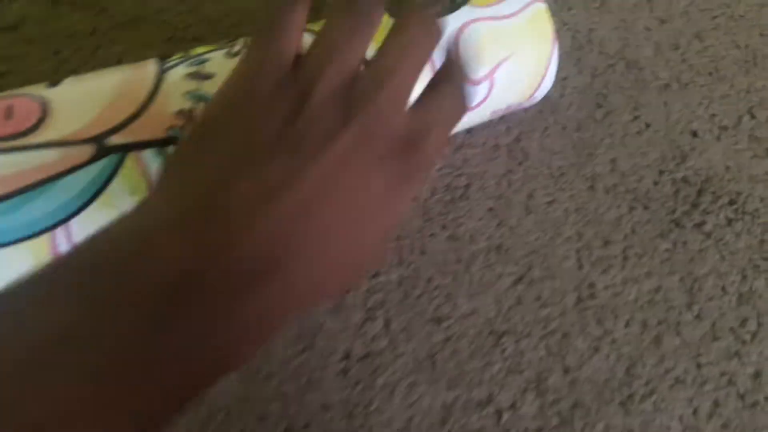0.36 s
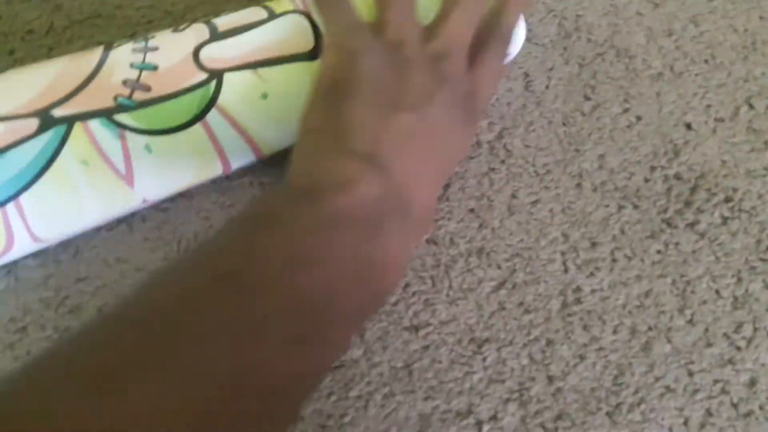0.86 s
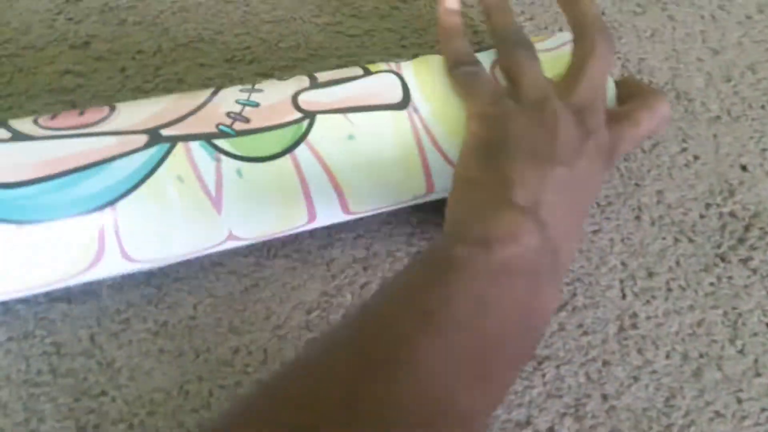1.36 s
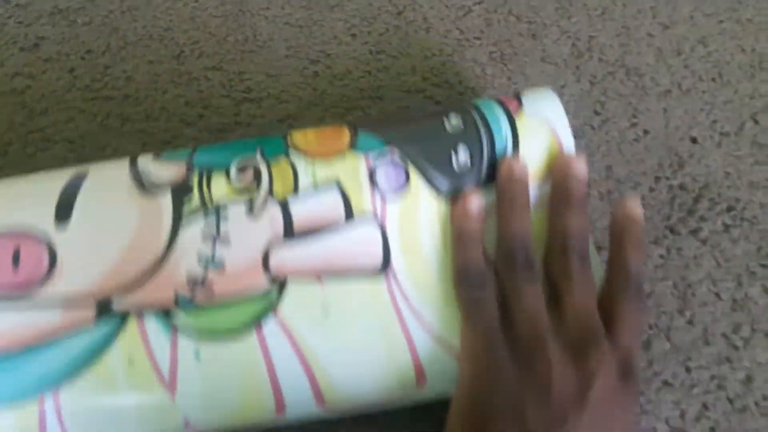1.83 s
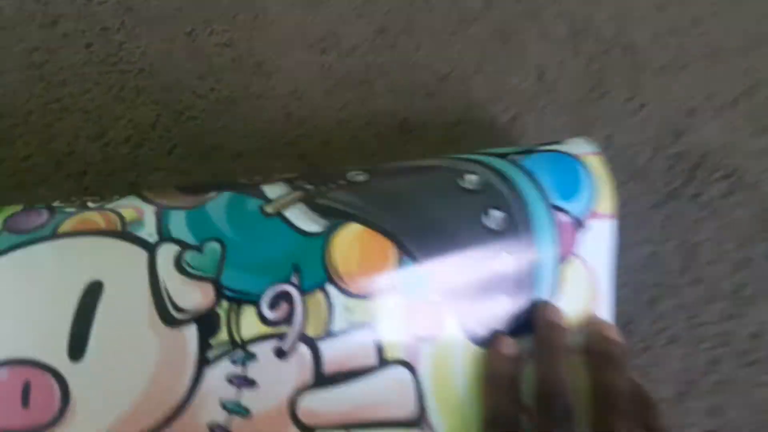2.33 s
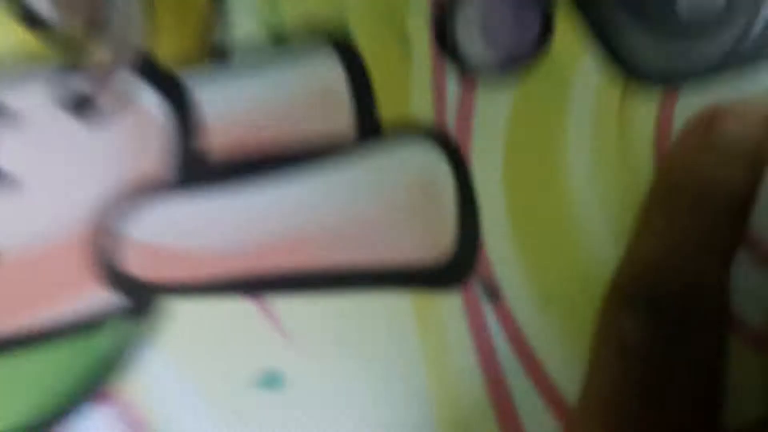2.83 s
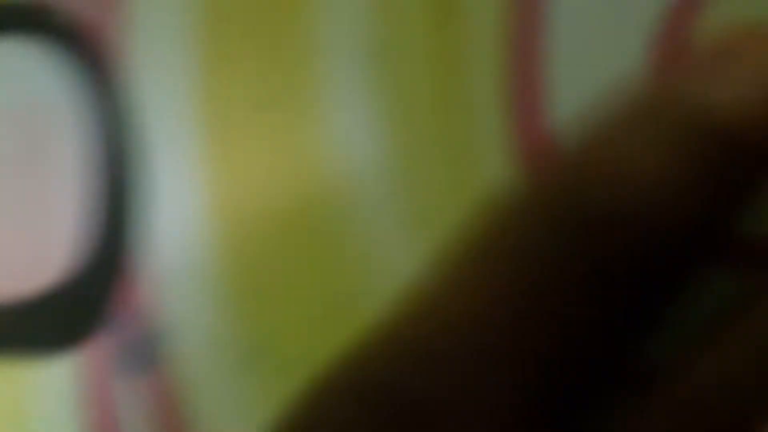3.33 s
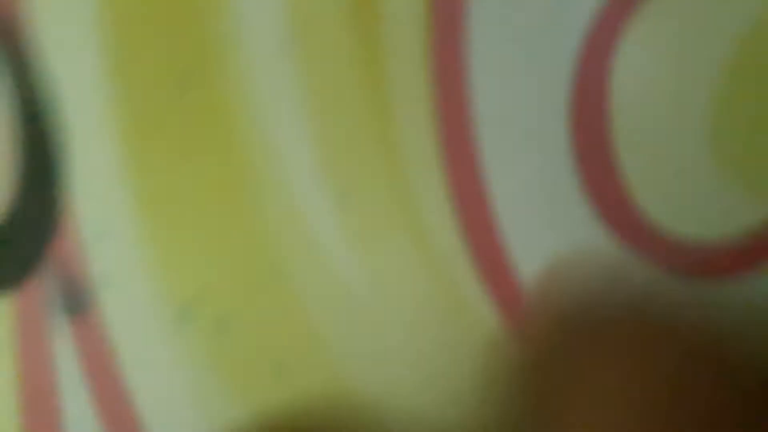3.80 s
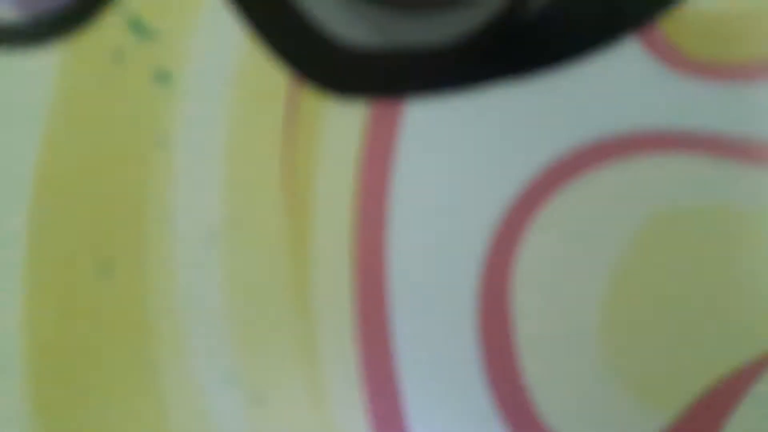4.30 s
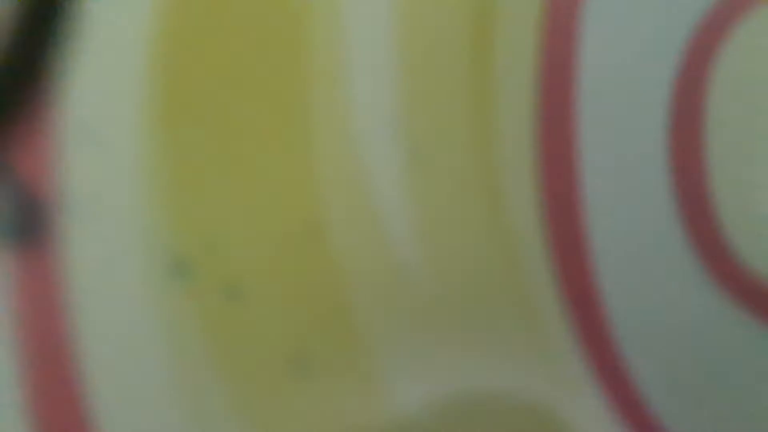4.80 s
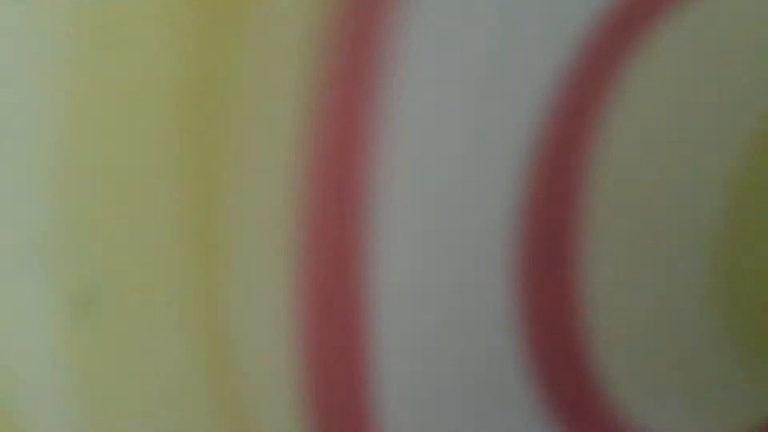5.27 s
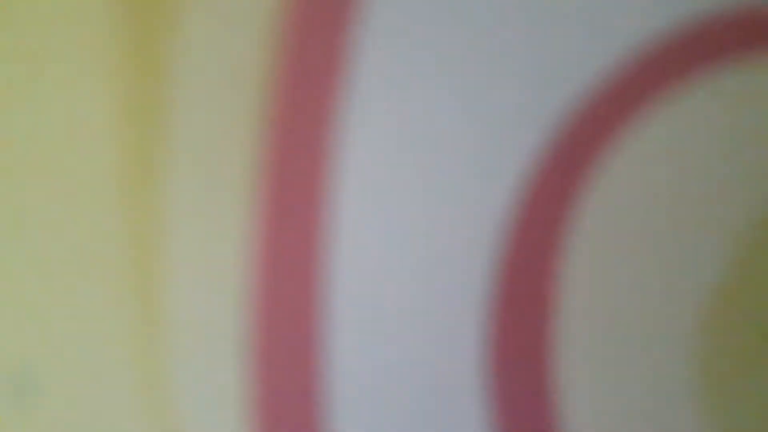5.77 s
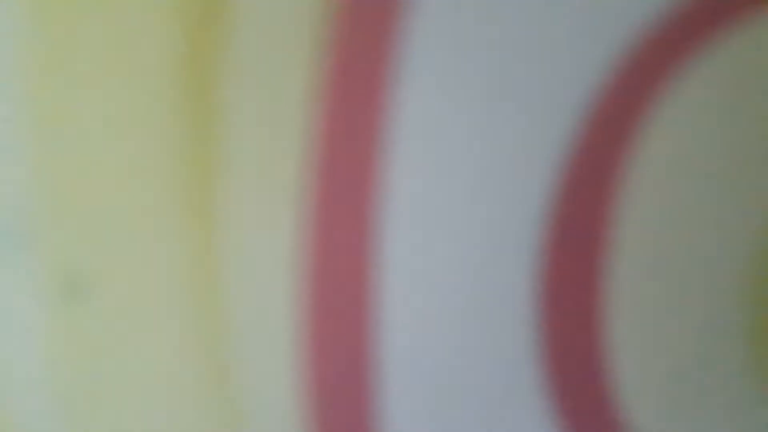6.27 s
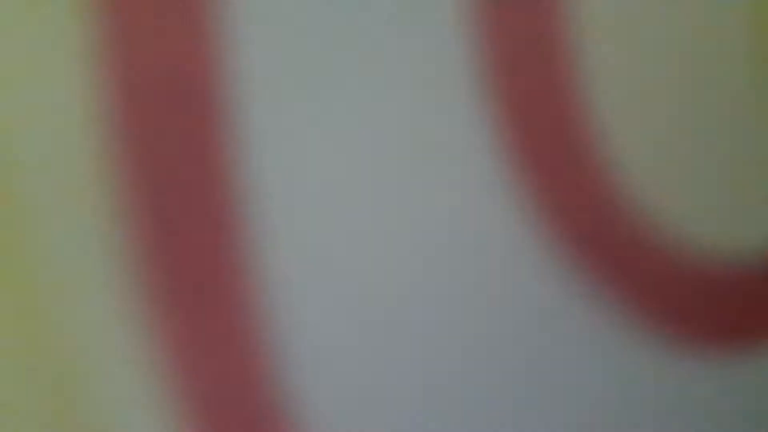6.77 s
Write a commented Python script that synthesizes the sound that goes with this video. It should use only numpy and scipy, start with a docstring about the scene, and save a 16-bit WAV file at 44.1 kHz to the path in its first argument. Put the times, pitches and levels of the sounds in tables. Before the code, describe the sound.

In a quiet room with soft air and a faint low hum, a hand works a roll of stiff glossy paper, heard close in stereo. From 0 to 0.6 s short rubs and a few dull crease pops sound; around 1 s it is nearly still, with tiny ticks. Light brushing and small clicks follow from 1.3 to 2.8 s, coloured by a hollow tube resonance that fades by about 3.4 s as the roll opens. From 3 s strokes grow stronger, with raspy hiss and buckles at 3.2 and 3.7 s, then a very loud sharp snap at 4.05 s. Lighter crackles and rubbing continue. Around 5.3 to 5.6 s comes a forceful scrape with heavy low pops, the biggest near 5.54 s. It lulls from 5.8 s, bumps at 6.1 s, then busy rubbing and snaps run to the abrupt end near 6.9 s, leaning toward one side.

```python
"""A hand unrolls a glossy paper poster on a carpet while a phone with two microphones moves in close.
Throughout, a quiet room hums faintly, and filtered stick-slip clicks make paper slide, rasp, drum and flex.
Creases snap early on, as decaying rings with cracks; light strokes follow, then stronger ones.
The rolled part answers as a pipe that fades as the roll opens; the hardest snaps come after four seconds.
After a brief lull near six seconds, busy strokes and snaps close the scene."""
import sys
import numpy as np
from scipy import signal
from scipy.fft import rfft, irfft
from scipy.io import wavfile
from scipy.ndimage import uniform_filter1d, minimum_filter1d

SR = 44100
rng = np.random.default_rng(int(sys.argv[2]) if len(sys.argv) > 2 else 0)


def level_to_linear(level):
    """Convert decibel levels to linear amplitude factors, elementwise."""
    exponent = np.asarray(level, float) / 20
    return 10 ** exponent


def dump(signal):
    """Clip the signal to [-1, 1] and save it as 16-bit WAV at the path in sys.argv[1]."""
    limited = np.clip(np.atleast_2d(signal).T, -1, 1)
    pcm = np.round(limited * 32767).astype(np.int16)
    wavfile.write(sys.argv[1], SR, pcm)


N = 303408
LAG_SAMPLES = 17  # the right port hears late
USUAL_DB = -55  # an ordinary effort

# how the fibre rasp follows a stroke: (above the effort [dB], growth with effort [dB/dB],
# per weight [dB/dB], per closeness [dB/dB])
GRIT_LAYER = (0.1, 1.14, 0.019, 0.0091)


def evened(x):
    """Scales to rms 1."""
    return x / np.sqrt(np.mean(x ** 2) + 1e-20)


def read(points, hz, column=1):
    """Reads a spectrum on a log-frequency axis."""
    table = np.array(points)
    return np.interp(np.log(hz + 1), np.log(table[:, 0] + 1), table[:, column])


def causal(db):
    """Minimum-phase response with the given dB gains, floored at -100 dB."""
    mirrored_db = np.r_[db, db[-2:0:-1]]
    log_gain = np.log(level_to_linear(np.maximum(mirrored_db, -100)))
    return np.fft.ifft(np.exp(np.conj(signal.hilbert(log_gain)))).real[:len(db) // 2]


def coloured(x, points, column=1):
    """Passes x through a causal filter of the given spectrum."""
    taps = causal(read(points, np.fft.rfftfreq(8192, 1 / SR), column))
    taps = taps.reshape((1,) * (x.ndim - 1) + (-1,))
    return signal.oaconvolve(x, taps, axes=-1)[..., :x.shape[-1]]


def paired(x):
    """Makes the right channel partly a late copy of the left, more so in the bass."""
    # left-right likeness: (frequency [Hz], likeness [0-1])
    likeness = [(60, 1), (300, 0.56), (1500, 0.048), (5000, 0.033), (15000, 0.08)]
    alike = np.clip(read(likeness, np.fft.rfftfreq(N, 1 / SR)), 0, 1)
    late = rfft(np.roll(x[0], LAG_SAMPLES))
    own = rfft(x[1])
    return np.array([x[0], irfft(alike * late + np.sqrt(1 - alike ** 2) * own, N)])


def room():
    """Soft broad air of the room with a wavering low hum, alike at both ports in the bass."""
    # room air: (frequency [Hz], level [dB per Hz])
    air_colour = [(15, -23), (40, -5), (80, -6), (200, -11.5), (300, -21.5), (650, -28.5), (2500, -33),
                  (6000, -51), (15500, -37)]
    # hum: (frequency [Hz], width of the wavering part [Hz], level [dB])
    hum_hz, width_hz, hum_db = (119, 7.3, -62.5)
    air_db, waver_depth = -63.5, 0.27
    air = level_to_linear(air_db) * evened(paired(coloured(rng.standard_normal((2, N)), air_colour)))
    r = np.exp(-np.pi * width_hz / SR)
    slow = [evened(signal.lfilter([1 - r], [1, -r], rng.standard_normal(N))) for _ in range(2)]
    waver = slow[0] + 1j * slow[1]  # wanders in level and phase
    carrier = np.exp(2j * np.pi * hum_hz * np.arange(N) / SR)
    hum = evened(((1 + waver_depth * waver) * carrier).real)
    return air + level_to_linear(hum_db) * hum


def closeness(s):
    """Near over far port in dB as the phone moves in."""
    # closeness of the phone to the sheet: (time [s], near over far port [dB])
    approach = [(0, 1.5), (.7, 1.5), (1.3, 6), (1.7, 0.5), (2.6, 1.5), (3.1, 4.5), (3.7, 7), (4.4, 7.5),
                (5.0, 8), (5.5, 10), (5.9, 9.5), (6.3, 8), (6.6, 13.5), (6.88, 10.5)]
    return np.interp(s, *np.transpose(approach))


def sides(pan_db):
    """Gains of the near and the far port."""
    return np.array([np.ones_like(pan_db), level_to_linear(-pan_db)])


def follow(layer, s):
    """Level in dB of one layer: the powers of all strokes and of the resting sheet add up."""
    # strokes of the hand: (peak time [s], rise [s], fall [s], effort [dB],
    # weight [dB]: pressing above 0, light brushing below)
    stroke_rows = [(0.0, 0.11, 0.16, -69, 3), (0.18, 0.059, 0.082, -55, 10.5),
                   (0.29, 0.013, 0.032, -50, 13), (0.35, 0.091, 0.066, -56.5, 4.5),
                   (.44, 0.12, 0.16, -79, 16), (0.594, 0.041, 0.035, -55, 12), (.7, 0.4, 0.074, -65.5, 0.5),
                   (.93, 0.73, 0.4, -76, -1), (1.18, 0.049, 0.26, -74.5, -3),
                   (1.266, 0.021, 0.026, -57, -10), (1.34, 0.2, .15, -65.5, -5),
                   (1.429, 0.063, 0.064, -60.5, -1.5), (1.532, 0.18, 0.087, -65, 1),
                   (1.619, 0.041, 0.2, -61, 5), (1.765, 0.023, 0.074, -56, 1),
                   (1.9, 0.076, 0.13, -64.5, -0.5), (2.03, .15, 0.051, -71, 6),
                   (2.198, 0.09, 0.045, -63, 2), (2.337, 0.57, 0.093, -60.5, 2),
                   (2.43, 0.062, 0.092, -60.5, 8), (2.523, 0.14, 0.059, -58.5, 7),
                   (2.6, 0.13, 0.15, -69, 5.5), (2.74, .06, 0.24, -59.5, 4), (2.886, 0.045, 0.096, -59, -2),
                   (3.071, 0.12, 0.22, -53, -2.5), (3.16, 0.11, 0.12, -57, 0.5),
                   (3.243, 0.042, 0.29, -48.5, -1.5), (3.32, 0.087, 0.078, -54.5, 14),
                   (3.41, .12, 0.22, -67, 8), (3.491, 0.087, 0.061, -53.5, 4),
                   (3.654, 0.021, 0.031, -44.5, -1), (3.7, 0.12, .05, -61, 19),
                   (3.755, 0.13, 0.061, -46.5, 2), (3.9, 0.069, .08, -47.5, 2.5),
                   (3.99, 0.22, 0.092, -51, -2.5), (4.096, 0.034, 0.11, -41.5, 3),
                   (4.159, 0.043, 0.089, -49, -5), (4.23, 0.071, .04, -49.5, -2),
                   (4.303, 0.037, 0.12, -52.5, 4), (4.4, 0.041, 0.11, -51.5, -10.5),
                   (4.462, 0.084, 0.14, -56.5, 5), (4.552, 0.048, 0.04, -56, 0),
                   (4.682, 0.15, 0.13, -53.5, 1.5), (4.84, 0.24, 0.1, -61, -0.5),
                   (4.939, 0.066, 0.064, -52.5, -4.5), (5.05, 0.16, 0.059, -61, -6),
                   (5.19, 0.027, .1, -55, -19), (5.276, 0.061, .1, -47, -7), (5.385, 0.16, 0.065, -38, -2),
                   (5.45, .06, 0.098, -48.5, 0), (5.515, 0.099, 0.034, -36, -1.5),
                   (5.547, 0.036, .028, -35, 18.5), (5.609, 0.08, 0.11, -54.5, 20.5),
                   (5.656, 0.063, 0.065, -53.5, -14.5), (5.733, 0.087, 0.039, -58, -10.5),
                   (6.09, .15, 0.048, -75.5, 3.5), (6.135, 0.034, 0.068, -71, 26),
                   (6.258, 0.013, .05, -59, 18), (6.301, 0.033, 0.047, -46.5, 7.5),
                   (6.35, .04, 0.16, -59.5, 0), (6.42, 0.16, 0.077, -60.5, 19),
                   (6.466, 0.029, 0.088, -49, 7.5), (6.52, 0.041, 0.054, -51, -4),
                   (6.578, .06, 0.1, -42, 3), (6.655, 0.054, 0.061, -43, 9.5),
                   (6.701, 0.035, 0.033, -36.5, 10), (6.76, 0.09, 0.098, -44.5, 5),
                   (6.832, 0.095, 0.042, -46, 11), (6.879, 0.014, .1, -41, 10)]
    drop_db = 15  # over one rise or fall time
    roundness = 1.153  # above 1: a round top and abrupt ends
    rest_db, rest_weight_db = -81.5, 10.5  # the sheet never lies quite still
    above_db, growth, per_weight, per_close = layer
    at, rise, fall, effort_db, weight_db = np.transpose(stroke_rows)[..., None]
    away = np.maximum((at - s) / rise, (s - at) / fall)
    stroke_db = effort_db - drop_db * away ** roundness
    moving_db = growth * (stroke_db - USUAL_DB) + per_weight * weight_db
    resting_db = growth * (rest_db - USUAL_DB) + per_weight * rest_weight_db
    total = (level_to_linear(moving_db) ** 2).sum(axis=0) + level_to_linear(resting_db) ** 2
    return USUAL_DB + above_db + 10 * np.log10(total) + per_close * closeness(s)


def slips(per_s, spread_db, clump_db, clump_s):
    """Tiny stick-slip clicks of uneven size that come in clumps, heard by both ports."""
    clumps = evened(uniform_filter1d(rng.standard_normal(N), max(round(clump_s * SR), 1)))
    size = level_to_linear(spread_db * np.minimum(rng.exponential(1, N), 5) + clump_db * clumps)
    hit = rng.random(N) < per_s / SR
    return paired(size * hit * rng.standard_normal((2, N)))


def swishing(x):
    """The touched patch keeps changing, so the colour of the rub drifts in patches."""
    depth_db, width_hz, length_s = 2.5, 1200, 0.1  # rms depth, smoothing widths
    hz, t, z = signal.stft(x, SR, nperseg=512)
    patches = rng.standard_normal((len(hz), len(t)))
    for size, axis in 2 * [(width_hz / hz[1], 0), (length_s / t[1], 1)]:
        patches = uniform_filter1d(patches, max(round(size), 1), axis=axis)
    return signal.istft(z * level_to_linear(depth_db * evened(patches)), SR, nperseg=512)[1][:, :N]


def handling():
    """Slips excite the fibres, the sheet and its slow bending, each at its own strength."""
    # colours of the layers: (frequency [Hz], level [dB per Hz])
    rasp_colour = [(1400, -21.5), (2000, -0.5), (3000, -2.5), (4000, -3.5), (5000, -35)]
    hiss_colour = [(3200, -20.5), (4000, 2.5), (5500, 0), (7600, -1.5), (8300, -33)]
    sheen_colour = [(7600, -42), (8300, 14), (10000, 14.5), (12000, 10), (13500, -9)]
    glint_colour = [(9500, -46), (13500, 8)]
    drum_colour = [(300, -47), (500, -6.5), (800, -2), (1300, -4), (2000, -9), (2800, -59.5)]
    flex_colour = [(30, -30), (70, 7.5), (150, 7.5), (280, 5), (500, 2), (750, -26.5)]
    # how hiss, sheen, drum and flex follow a stroke: (above the effort [dB],
    # growth with effort [dB/dB], per weight [dB/dB], per closeness [dB/dB])
    hiss_layer = (-0.037, 1.13, -0.4, 0.17)
    sheen_layer = (-12.5, 1.39, -0.5, 0.5745)
    drum_layer = (2.76, 1.105, 0.5, 0.013)
    flex_layer = (-5, 0.93, 0.67, 0.9)
    pan_per_effort = 0.1  # strong strokes land nearer the close port [dB/dB]

    s = np.arange(0, N + 64, 64) / SR
    layers = (GRIT_LAYER, hiss_layer, sheen_layer, drum_layer, flex_layer)
    columns = [follow(layer, s) for layer in layers]
    columns.append(closeness(s) + pan_per_effort * (columns[0] - USUAL_DB))
    columns = [np.interp(np.arange(N) / SR, s, c) for c in columns]
    rasp_db, hiss_db, sheen_db, drum_db, flex_db, pan_db = columns

    fine = slips(20000, spread_db=2.5, clump_db=1.5, clump_s=.008)
    coarse = slips(4000, spread_db=1.0, clump_db=1.5, clump_s=0.0071)
    lumps = slips(1500, spread_db=2.0, clump_db=2.5, clump_s=0.016)

    rasp = level_to_linear(rasp_db) * evened(coloured(fine, rasp_colour))
    hiss = level_to_linear(hiss_db) * evened(coloured(fine, hiss_colour))
    glint_gain = level_to_linear(2.5 + 0.2 * (sheen_db + 41.5))  # close, hard sliding reaches higher
    glint = glint_gain * evened(coloured(fine, glint_colour))
    sheen = level_to_linear(sheen_db) * (evened(coloured(fine, sheen_colour)) + glint)
    sheen = sheen * level_to_linear([[0], [-4]])  # the hand shades the far port
    drum = level_to_linear(drum_db) * evened(coloured(coarse, drum_colour))
    flex = level_to_linear(flex_db) * evened(coloured(lumps, flex_colour))
    flex = flex * level_to_linear([[0], [-3]])  # near field favours the close port
    return (swishing(rasp + hiss + sheen + drum) + flex) * sides(pan_db)


def tube(paper):
    """The air column in the rolled-up part answers like an open pipe, less as the roll opens."""
    # pipe modes: (frequency [Hz], width [Hz], level [dB])
    pipe_modes = [(270, 15.7, 7.5), (520, 230, -2.5), (712, 160, -3)]
    # how much the pipe sounds as the roll opens: (time [s], level [dB])
    opening = [(2.6, 0), (3.4, -17.5)]
    modes = 0
    for hz, width_hz, db in pipe_modes:
        modes = modes + level_to_linear(db) * signal.lfilter(*signal.iirpeak(hz, hz / width_hz, SR), paper)
    return modes * level_to_linear(np.interp(np.arange(N) / SR, *np.transpose(opening)))


def ticks(count=70):
    """Small creases at random moments, as strong as the hand is busy."""
    low_hz, high_hz = 150, 1500
    above_db, spread_db, crack_db = 7, 2, -8
    when, size, pitch, hard = rng.random((count, 4)).T
    s = (np.arange(count) + when) * N / SR / count
    peak_db = follow(GRIT_LAYER, s) + above_db - spread_db * np.log(size + .1)
    hz = low_hz * (high_hz / low_hz) ** pitch
    return list(zip(s, peak_db, hz, crack_db + 16 * (hard - .5)))


def ring_time(peak_db, hz, crack_db):
    """T60 in s of a buckle: shorter for high and for strong ones, longer for soft bumps."""
    t60_at_500_hz, pitch_power = 0.014, 0.1  # ordinary buckle
    shorter_per_db, bump_from_db, longer_per_db = 0.08, -17.5, 1
    bump_db = longer_per_db * max(bump_from_db - crack_db, 0)
    strength_db = shorter_per_db * (peak_db + 34)
    t60 = t60_at_500_hz * (500 / hz) ** pitch_power * level_to_linear(bump_db - strength_db)
    return max(t60, .002)


def cracking(crack_db, t):
    """A buckle's crack: one narrow pull of the air, and tearing fibres in hard breaks."""
    # tearing noise: (frequency [Hz], level [dB per Hz])
    crack_colour = [(500, -33.5), (1500, -1.5), (4500, 5.5), (7400, 1.5), (8500, -13), (12000, -18.5),
                    (16000, -23)]
    tear_t60_s, tear_growth, tear_shared = .0065, 1.45, 1.5
    tearing = rng.standard_normal((2, len(t))) * level_to_linear(-60 * t / tear_t60_s)
    tearing = coloured(tearing, crack_colour)
    tearing[1] += tear_shared * tearing[0]  # both ports hear much the same tear
    tearing /= abs(tearing).max(axis=1, keepdims=True)
    pull = -np.exp(-.5 * (t / .00007 - 3) ** 2)  # the first break, smooth
    tear_gain = level_to_linear(tear_growth * crack_db - 6.5)  # only hard breaks tear fibres
    return tear_gain * tearing + level_to_linear(min(crack_db + 3.0, 0)) * pull


def snaps():
    """Each buckle pulls the air in with a crack, then a patch of sheet swings back a few cycles."""
    # creases, from soft bumps to sharp cracks: (time [s], peak [dB], ring [Hz], crack strength [dB])
    snap_rows = [(.1363, -20, 1010, -13.5), (.1734, -30, 1020, -8), (.2824, -21, 806, -15.5),
                 (.3223, -35, 2170, -20), (.3353, -33, 980, 1.5), (.3915, -37, 2660, -4.5),
                 (0.9639, -51, 150, -2), (.9738, -51, 520, 3), (1.5075, -32, 1280, -19.5),
                 (1.62, -43, 500, -14), (1.6864, -33.5, 254, -20), (1.73, -37, 225, -12),
                 (1.757, -33, 1190, 2), (1.836, -45, 900, -12), (1.8839, -36, 814, -6),
                 (1.998, -36.5, 800, -9.5), (2.4274, -30, 714, 0.5), (2.4952, -44, 714, 4),
                 (2.6965, -32.5, 760, -11.5), (2.7464, -49, 200, 8), (2.7697, -55.5, 1270, 14.5),
                 (2.7935, -45, 178.6, 5.5), (2.8394, -41, 240, -2), (2.9732, -42.5, 684, -20),
                 (3.243, -15, 897, -18), (3.2557, -37, 1380, 4.5), (3.311, -28, 270, 3),
                 (3.3235, -38.5, 119, -30), (3.527, -37, 892, 1), (3.623, -35, 156, -3),
                 (3.648, -39, 199, -29), (3.6971, -17, 530, -20), (3.7494, -32.5, 198, -28),
                 (3.8383, -18, 180, -6.5), (3.8517, -19, 160, -10), (3.9125, -26, 169, 0),
                 (3.924, -23, 910, -11), (3.939, -25, 158, -12), (3.9985, -33, 850, -4),
                 (4.0525, 1.5, 860, 7), (4.0573, -10.5, 710, -22), (4.0757, -27.5, 710, 8),
                 (4.087, -23.5, 392, -28), (4.1176, -13, 1180, -12), (4.2502, -35.5, 1070, 7),
                 (4.3097, -30.5, 262, -23), (4.3384, -30, 310, 1), (4.3628, -37, 270, 4),
                 (4.3895, -42, 3320, 6), (4.4114, -39.5, 3100, 8), (4.4598, -41.5, 3400, 7),
                 (4.6383, -31, 860, 2), (4.6439, -31, 333, 3), (4.6666, -31.5, 190, -16),
                 (4.6828, -35.5, 186, 9), (4.6927, -39.5, 880, 10.5), (4.7599, -29, 186, -14),
                 (5.1838, -22.5, 285, -19), (5.2055, -28.5, 243, -24), (5.2196, -31, 240, -24),
                 (5.259, -27.5, 190, -35), (5.2748, -10.5, 222, -20.5), (5.2866, -24.5, 106, -32),
                 (5.304, -27, 2290, -15), (5.372, -34, 320, -27), (5.4822, -28, 150, -29.5),
                 (5.5132, -7.5, 277, -25.5), (5.5306, -6.5, 330, -10), (5.5363, -9, 351, 1),
                 (5.5388, 12, 251, -17.5), (5.5469, -8, 188.4, -26.5), (5.5822, -20.5, 310, -29),
                 (5.59, -14.5, 225, -2), (5.6195, -29, 130, -26), (5.632, -18, 163, -28),
                 (5.648, -18, 400, -18), (5.6779, -24, 237, -9.5), (5.7197, -28, 688, -5),
                 (6.1136, -12, 290, -9.5), (6.1187, -16.5, 370, -10), (6.1423, -15.5, 288, -13.5),
                 (6.2462, -36.5, 175, -34.5), (6.293, -31.5, 240, -4.5), (6.3143, -25.5, 166, -33),
                 (6.3283, -21.5, 150, -33.5), (6.3878, -28, 160, -28), (6.4509, -23.5, 670, 6),
                 (6.4651, -19.5, 235, -30), (6.613, -15.5, 297, -10), (6.6685, -25.5, 666, 11),
                 (6.6946, -10, 300, 0), (6.7881, -2.5, 503, -19), (6.802, -20, 150, -35),
                 (6.813, -41, 460, 12), (6.821, -27.5, 220, 8), (6.831, -17.5, 150, -30.5)]
    pan_base_db, pan_per_peak, pan_per_crack = 3, .1, -0.39  # [dB], [dB/dB], [dB/dB]
    length = 3072
    t = np.arange(length) / SR
    out = np.zeros((2, N + length + LAG_SAMPLES))
    for s, peak_db, hz, crack_db in [*snap_rows, *ticks()]:
        pan_db = closeness(s) + pan_base_db + pan_per_peak * (peak_db + 48) + pan_per_crack * crack_db
        rise_s = 0.000049 * level_to_linear(-.5 * crack_db)  # the less it cracks, the softer it starts
        fade = level_to_linear(-60 * t / ring_time(peak_db, hz, crack_db)) * (1 - np.exp(-t / rise_s)) ** 2
        ring = -fade * np.cos(2 * np.pi * hz * t + 0.67)
        wide_hz = rng.uniform(0.32, 1.0) * hz  # a wider patch, felt mostly at the near port
        wide = -fade * np.cos(2 * np.pi * wide_hz * t)
        crack = level_to_linear([[0], [7]]) * cracking(crack_db, t)  # carries round the phone better
        sound = ring + np.array([[.4], [.2]]) * wide + crack
        sound *= level_to_linear(peak_db) * sides(pan_db)[:, None]
        at = round(s * SR)
        late = at + LAG_SAMPLES
        out[0, at:at + length] += sound[0]
        out[1, late:late + length] += sound[1]
    return out[:, :N]


def scene():
    """Paper, its tube and the room."""
    paper = handling() + snaps()
    return paper + tube(paper) + room()


def limited(ports):
    """Peak limiter shared by both ports, letting go within milliseconds."""
    ceiling_db, recovery_db_per_s = -.4, 1000.0
    fall_db = np.arange(N) * recovery_db_per_s / SR
    over_db = np.maximum(20 * np.log10(abs(ports).max(axis=0) + 1e-9) - ceiling_db, 0)
    held_db = np.maximum.accumulate(over_db + fall_db) - fall_db
    ahead_db = uniform_filter1d(-minimum_filter1d(-held_db, size=25), size=25)  # looks a little ahead
    return ports / level_to_linear(ahead_db)


def top_cut(x):
    """Nothing passes above the cut-off."""
    return signal.sosfilt(signal.butter(12, 16490, fs=SR, output="sos"), x)


def record(dry):
    """Port colours, the peak limiter, the band limit and the converter's steady offset."""
    # the two microphone ports: (frequency [Hz], left [dB], right [dB])
    port_colours = [(19.7, -26.5, -29), (51.6, -7, -17), (98, -2, -2.5), (4040, 0, -2.5),
                    (5700, -2.5, -2.5), (6900, 3, -1.5), (7640, -3, -17), (8140, -9.5, 6),
                    (8800, -3.5, -8.5), (15550, -8.5, -6.5)]
    edge_hz, offset = 15850, -.0006
    ports = np.array([coloured(dry[i], port_colours, column=i + 1) for i in range(2)])
    edge = signal.firwin(511, edge_hz, window=("kaiser", 9), fs=SR)
    mix = signal.oaconvolve(limited(ports), edge[None], "same") + offset
    return top_cut(mix)


dry = scene()
out = record(dry)
dump(out)
```